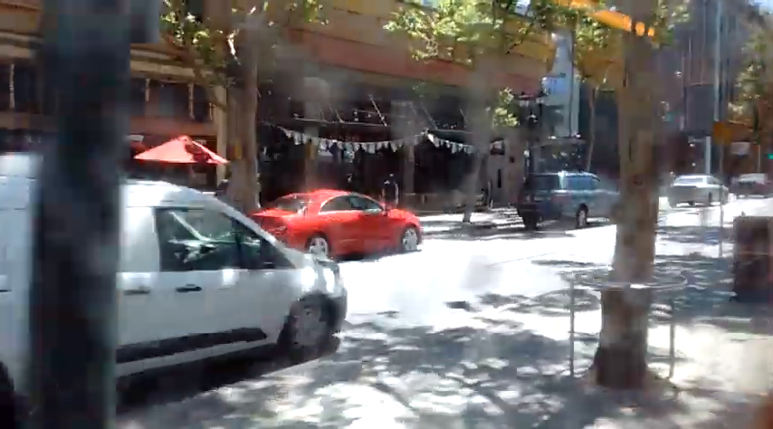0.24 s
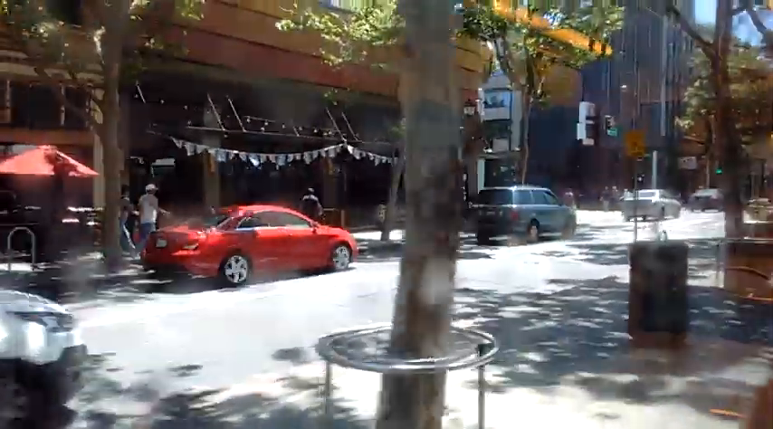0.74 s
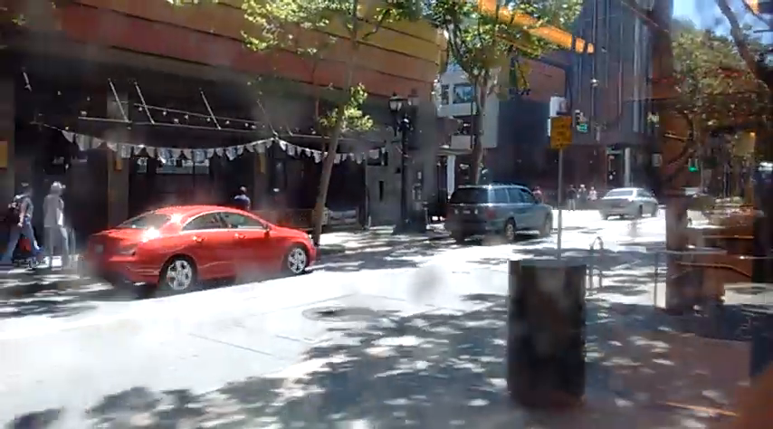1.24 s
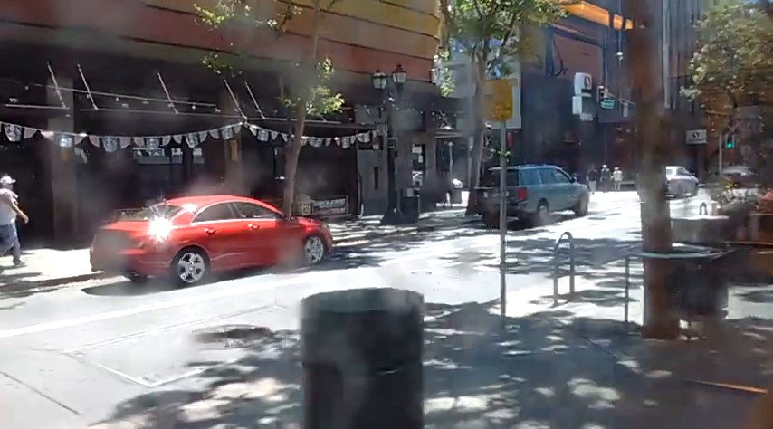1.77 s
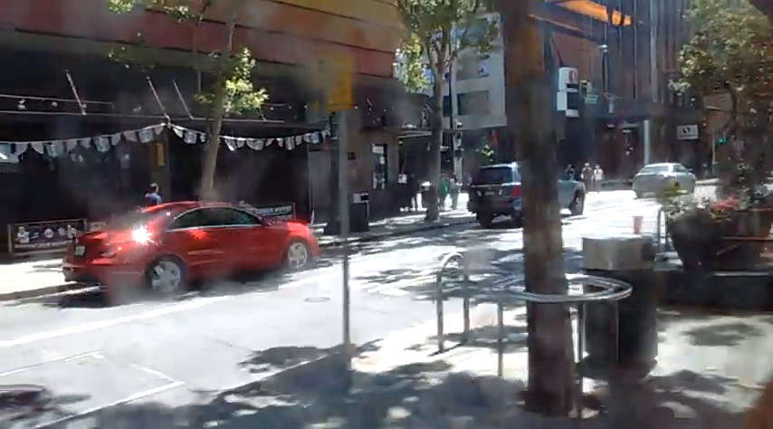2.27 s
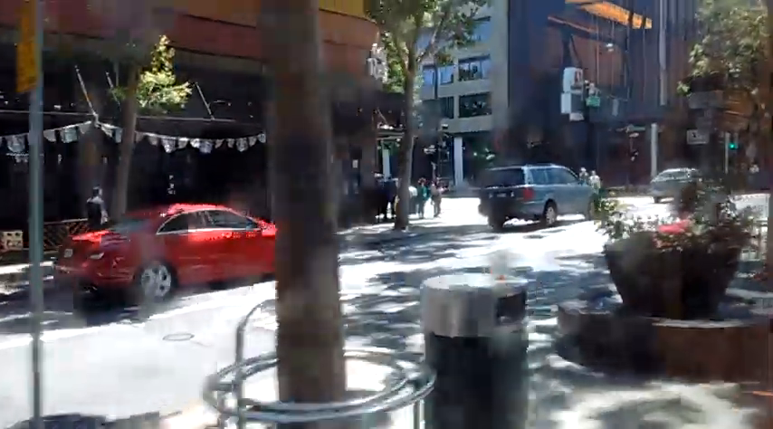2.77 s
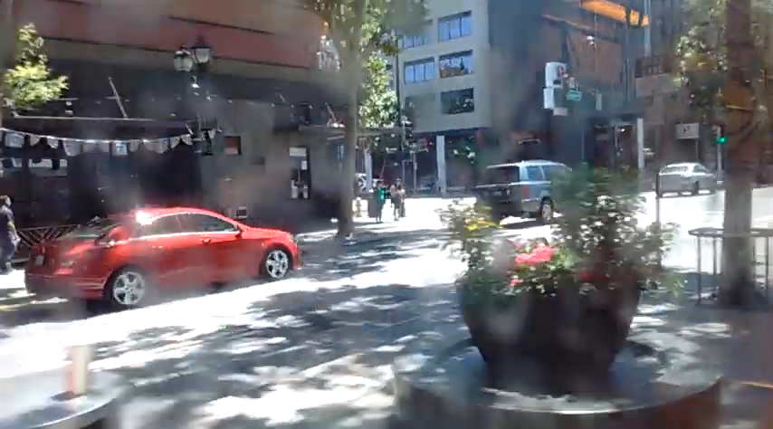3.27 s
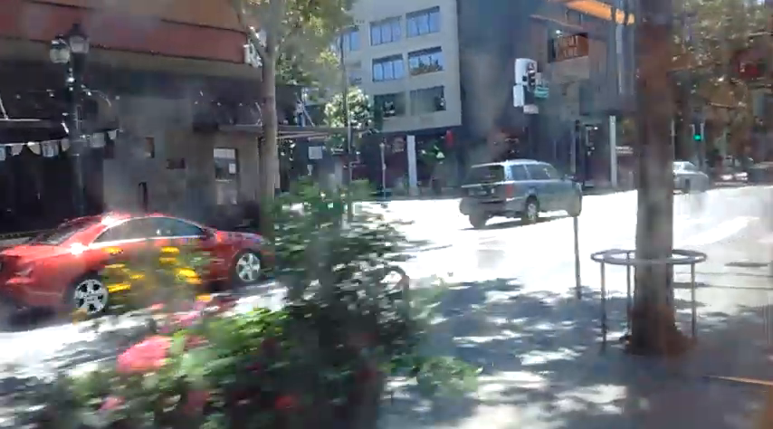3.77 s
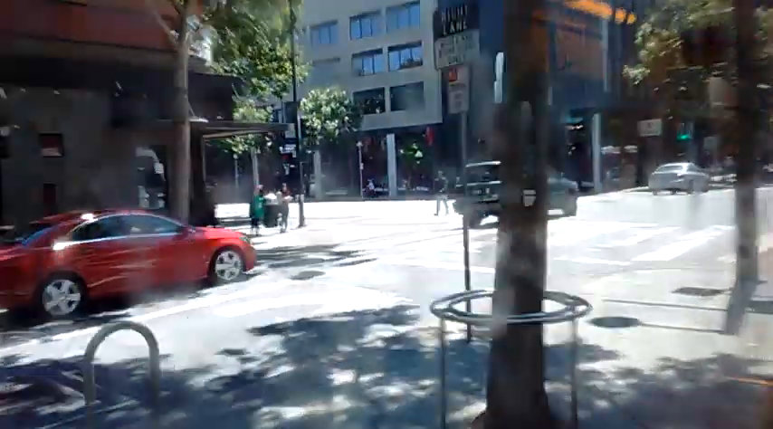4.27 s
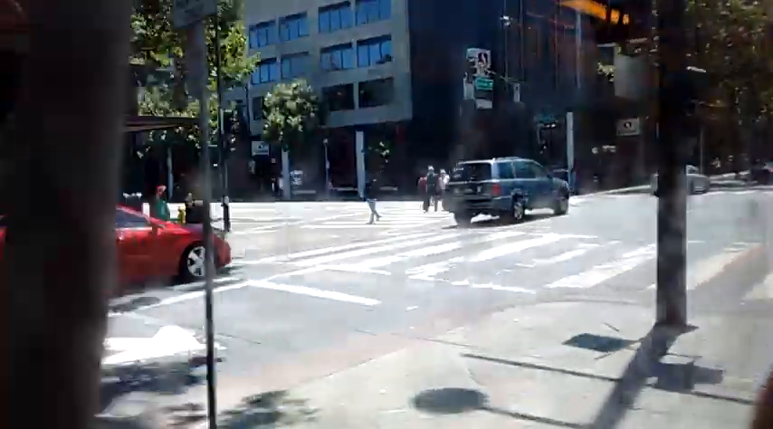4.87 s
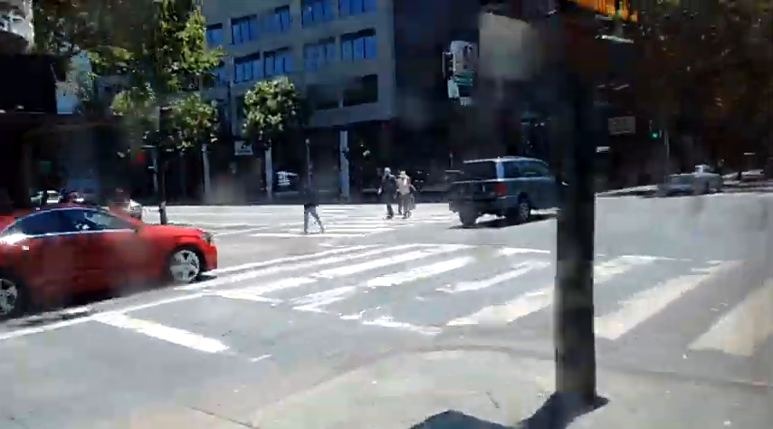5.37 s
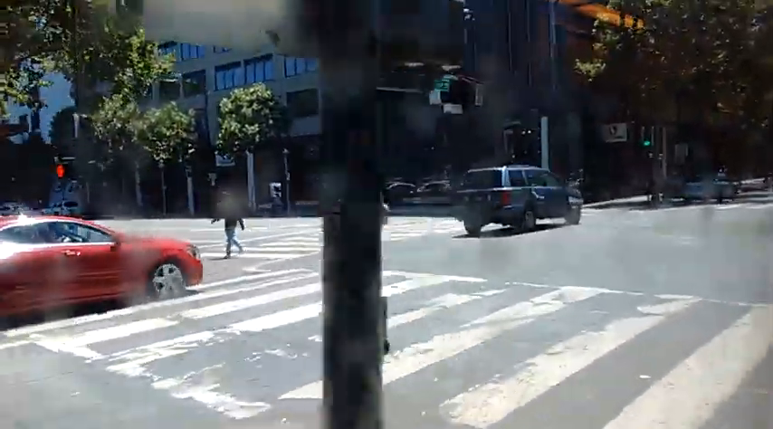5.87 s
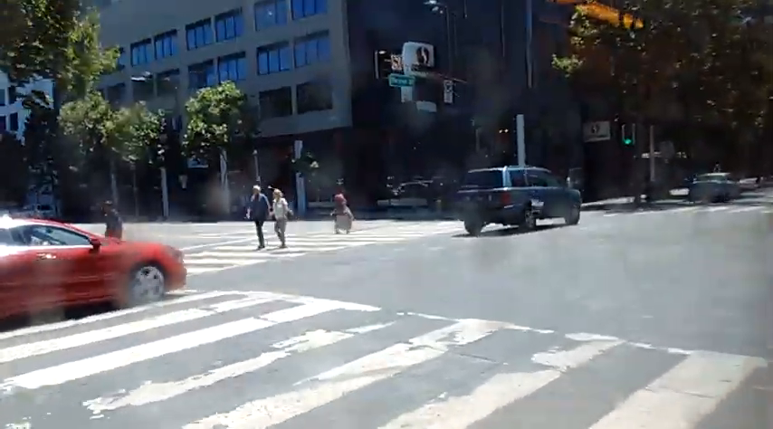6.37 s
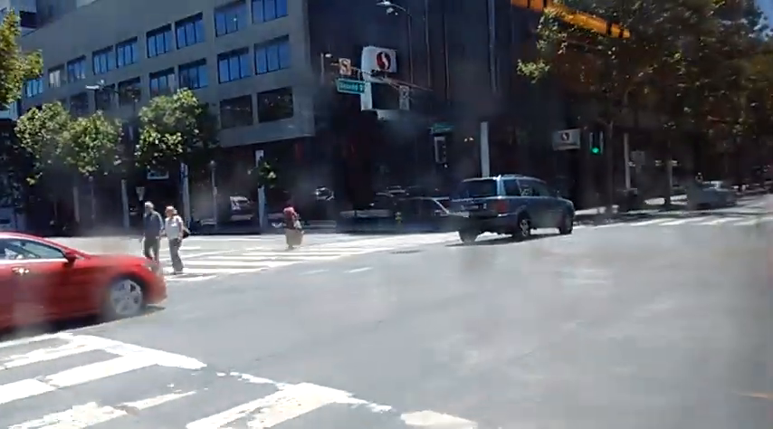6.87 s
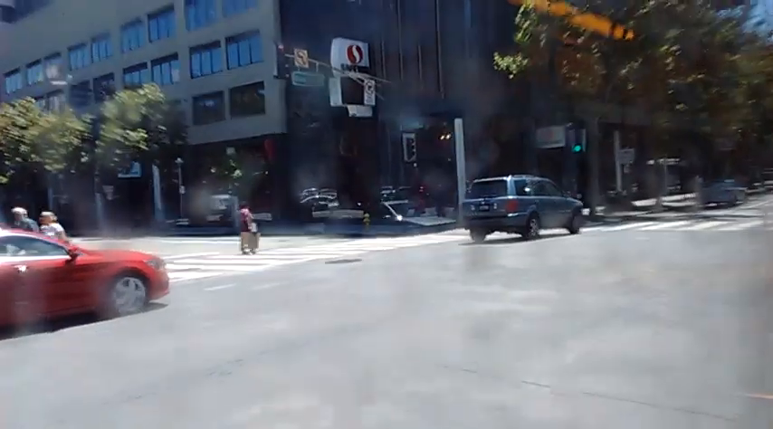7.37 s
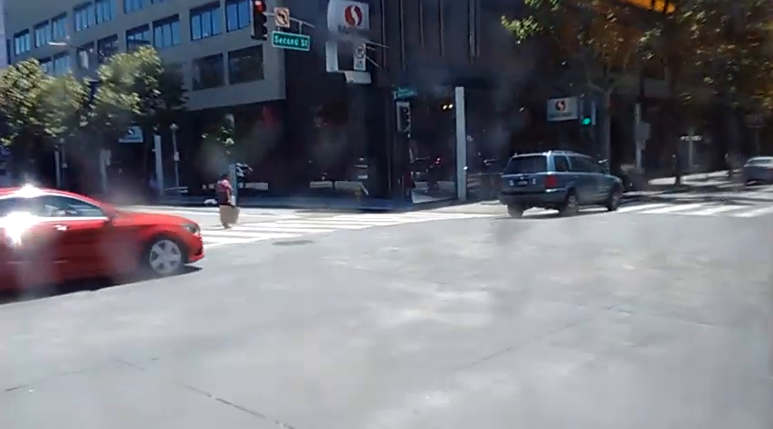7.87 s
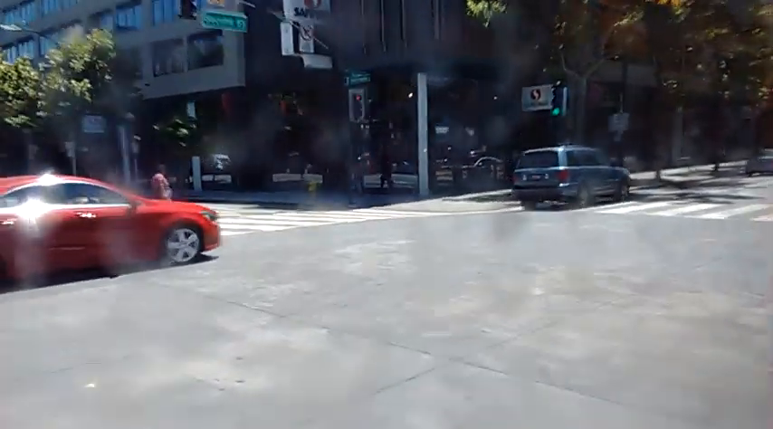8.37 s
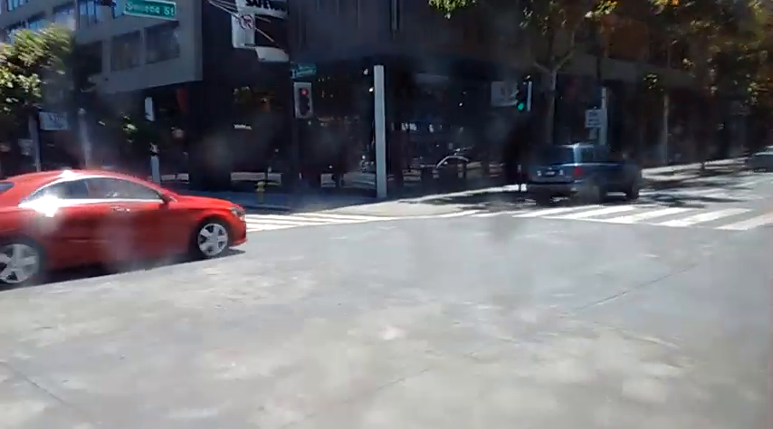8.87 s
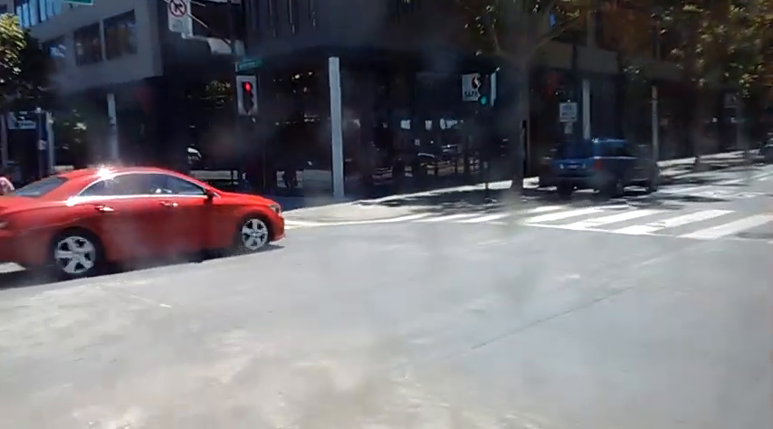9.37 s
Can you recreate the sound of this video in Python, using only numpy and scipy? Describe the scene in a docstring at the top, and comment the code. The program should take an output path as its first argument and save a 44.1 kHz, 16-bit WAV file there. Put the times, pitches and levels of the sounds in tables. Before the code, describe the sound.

Interior of a light rail car running steadily along a city street, heard by a stereo microphone in the cabin for about 9.6 seconds. Throughout, a very low boom dominates, beating and throbbing in irregular soft pulses several times a second, above a broad panel rumble. A low floor drone swells into hums in the first half second. Much quieter are a muffled rail roar, airy hiss, hollow wheel howl and a thin, steady electric whine. Tiny ticks occur near 0.5, 1, 2.7, 3.8 and 4.5 seconds; a low knock with a click and short scuff comes at 3.5. A soft low swell rises around 4.6 to 5. From 5.6 to 6 the wheels pass onto a crossing: rush, hiss and whine soften, the boom grows. Gear tones sing faintly around 6.3 to 7.6. Strong throbs cluster near 8.5, with faint ticks at 8.65, and the ride continues to the end.

```python
"""Cabin air booming and throbbing inside a light rail car, as two resonant modes shaken by the wheels.
Shaped noise makes the panel rumble, growl, howl, rail roar and hiss; bent sines make the hums and singing gear.
On the crossing the rush softens and the boom grows. Steady sines make a thin inverter whine.
Noise bursts make the fittings tick; bands of noise make low swells and thuds, rim ringing and hiss swells."""
import sys
import numpy as np
from scipy import signal
from scipy.fft import rfft, irfft, next_fast_len
from scipy.io import wavfile
from scipy.ndimage import uniform_filter1d, minimum_filter1d

SR = 44100
rng = np.random.default_rng(int(sys.argv[2]) if len(sys.argv) > 2 else 0)


def persist_wave(psi):
    """Save psi, clipped to +-1, as 16-bit WAV."""
    counts = np.round(np.clip(psi, -1, 1) * 32767).astype(np.int16)
    wavfile.write(sys.argv[1], SR, np.atleast_2d(counts).T)


N = 424241
SIZE = next_fast_len(N)
HZ = np.fft.rfftfreq(SIZE, 1 / SR)
TIME = np.arange(N) / SR


def gain_of(db):
    """Amplitude gain from dB."""
    return 10 ** (np.asarray(db) / 20)


def evened(x):
    """Scales to rms 1."""
    return x / np.sqrt(np.mean(x ** 2) + 1e-20)


def over_time(rows):
    """Value at every sample, interpolated from rows of (s, value)."""
    return np.interp(TIME, *np.transpose(rows))


def colour(rows):
    """Gain at every frequency from rows of (Hz, dB), interpolated over log frequency."""
    hz, db = np.transpose(rows)
    return gain_of(np.interp(np.log(HZ + 1), np.log(hz), db))


def resonances(modes):
    """Gain at every frequency of steep-sided resonances whose powers add."""
    power = sum(gain_of(db) ** 2 / (1 + ((HZ - hz) / width) ** 2) ** 3 for hz, width, db in modes)
    return np.sqrt(power)


def filtered(x, shape):
    """Passes both channels through a gain given at every frequency."""
    return irfft(rfft(x, SIZE) * shape, SIZE)[:, :N]


def white():
    """Spectrum of fresh white noise."""
    return rng.standard_normal(len(HZ)) + 1j * rng.standard_normal(len(HZ))


def wobble(rate_hz):
    """Random drift of rms 1, up to about the given rate."""
    return evened(irfft(white() / (1 + (HZ / rate_hz) ** 2), SIZE)[:N])


# The two microphone ports, opposed in the bass. Each row: frequency in Hz, likeness 0-1,
# lead of the left in radians, left minus right in dB.
PORT_RESPONSE = [(30, 0.97, 3.13, 1.8), (70, 0.9995, 3.13, 1.7), (200, 0.998, 3.14, 1.9),
                 (400, 0.9939, 3.2, 2.5), (600, 0.8789, 3.45, 4.3), (800, 0.8091, 3.91, 4.8),
                 (1000, 0.5469, 4.38, 6.5), (1200, 0.8081, 5.82, 4.8), (1550, 0.9314, 6.42, 4.3),
                 (2000, 0.8199, 6.99, 5.1), (2450, 0.5463, 8.46, 5.4), (2800, 0.8125, 9.32, 4.0),
                 (3250, 0.8503, 9.52, 2.9), (3950, 0.0518, 11.21, 3.3), (4650, 0.8019, 12.55, 3.1),
                 (5500, 0.1905, 11.11, 1.3), (6350, 0.9159, 9.42, -0.5), (7200, 0.5858, 7.84, -4.0),
                 (8000, 0.626, 6.5, -5.3), (9500, 0.3923, 3.95, -3.7), (12000, 0.752, 6.34, -0.2)]


def port_pair():
    """Spectral gains to the right port: of the left port's sound, and of sound of its own."""
    hz, *columns = np.transpose(PORT_RESPONSE)
    same, lead_rad, balance_db = (np.interp(HZ, hz, c) for c in columns)
    same = np.clip(same, 0, 1)
    shared = same * np.exp(-1j * lead_rad) / gain_of(balance_db)
    own = np.sqrt(1 - same ** 2) / gain_of(balance_db)
    return shared, own


def heard(x, ports):
    """One clear sound as it arrives at the left and right ports."""
    return irfft(rfft(x, SIZE) * np.array([np.ones(len(HZ)), ports[0]]), SIZE)[:, :N]


def noise(shape, ports):
    """Diffuse noise of the given spectrum at both ports; rms 1 on the left."""
    shared, own = ports
    left = white()
    right = shared * left + own * white()
    x = irfft(np.array([left, right]) * shape, SIZE)[:, :N]
    return x / np.sqrt(np.mean(x[0] ** 2))


def steadied(x, span_s):
    """Evens out swells slower than span_s and keeps the faster beating."""
    size = max(int(span_s * SR), 1)
    power = uniform_filter1d(uniform_filter1d(x[0] ** 2, size), size)
    return x / np.sqrt(abs(power) + 1e-6)


def strands(modes, ports, span_s):
    """Each mode rings as its own steadied noise band, scaled by the modes' total power."""
    power = sum(gain_of(db) ** 2 for hz, width, db in modes)
    total = sum(gain_of(db) * steadied(noise(resonances([(hz, width, 0)]), ports), span_s)
                for hz, width, db in modes)
    return total / np.sqrt(power)


def arch(s, length_s):
    """A smooth rise from 0 to 1 and back, centred on s."""
    out, near = np.zeros(N), abs(TIME - s) < length_s / 2
    out[near] = np.cos(np.pi * (TIME[near] - s) / length_s) ** 2
    return out


def swell(ports, s, length_s, hz, width_hz, db):
    """A band of noise that rises and falls once."""
    return gain_of(db) * arch(s, length_s) * noise(resonances([(hz, width_hz, 0)]), ports)


def tones(rows, bend, peaked):
    """Each row of (centre s, length s, Hz, dB) rises and falls once, its pitch bending up or down."""
    out = np.zeros(N)
    draws = rng.uniform(-1.17, 1, (len(rows), 2))
    for (s, length_s, hz, db), (phase, way) in zip(rows, draws):
        near = abs(TIME - s) < length_s / 2
        t = TIME[near] - s
        turns = hz * (t + way * bend * t ** 2 / length_s) + phase
        envelope = abs(np.cos(np.pi * t / length_s)) ** peaked
        out[near] += gain_of(db) * envelope * np.sin(2 * np.pi * turns)
    return out


# Passage from paving onto the street crossing. Each row: time in seconds, share of crossing 0-1.
CROSSING = [(5.6, 0), (5.95, 0.99)]


def crossing_share():
    """How far the wheels are on the crossing, 0-1, at every sample."""
    return over_time(CROSSING)


# Roughness of the track under the wheels. Each row: time in seconds, roughness in dB about its mean.
TRACK_ROUGHNESS = [(0.0, -0.8), (.15, -0.8), (.33, 1.1), (.46, 2), (.53, -1.5), (.7, -1.5), (.86, -1.2),
                   (.95, 0.5), (1.13, 1.3), (1.27, -2), (1.42, -0.1), (1.51, -3), (1.75, 0.2), (1.85, 1.5),
                   (1.98, 1.5), (2.13, 1.2), (2.35, 2), (2.47, -0.5), (2.63, 0.5), (2.72, 1.3),
                   (2.78, -1.9), (3.0, .4), (3.13, 1.5), (3.33, -0.5), (3.51, 2.2), (3.74, 0), (3.87, 0),
                   (4.02, 0), (4.35, 0), (4.58, 1), (4.7, 0.4), (4.9, -0.5), (5.15, 0.5), (5.28, -1.6),
                   (5.38, 0.8), (5.5, -2.6), (5.58, -0.8), (5.78, 1), (5.9, -1), (6.12, -1.5), (6.27, 1.7),
                   (6.43, 0), (6.5, 1.4), (6.72, 0.3), (7.0, 0.5), (7.06, -.4), (7.22, -1), (7.33, 2),
                   (7.47, 2.5), (7.62, -1.7), (7.68, -0.3), (8.1, 0), (8.15, -1.2), (8.29, -3.5),
                   (8.38, -1.5), (8.65, 1), (8.82, -2.5), (8.93, -1.5), (9.06, .5), (9.22, 0), (9.35, -3),
                   (9.5, 0), (9.61, 3)]


def ride(follow, db=0, crossing_db=0):
    """Gain of a layer: its own level, a share of the track's roughness, and a step onto the crossing."""
    return gain_of(db + follow * over_time(TRACK_ROUGHNESS) + crossing_db * crossing_share())


# Lowest and next air mode of the cabin. Each row: frequency in Hz, width in Hz, relative level in dB.
LOW_BOOM_MODES = [(84.15, 11.6, 0)]
HIGH_BOOM_MODES = [(101.7, 13, 0)]
# Throbs as the wheels bump along. Each row: centre in seconds, length in seconds before ringing,
# guide pitch in Hz that weights the two modes, peak in dB.
THROBS = [(0.308, .05, 94, -9), (0.573, 0.061, 92, -6.5), (0.622, 0.037, 94, -3), (0.652, .03, 97, -4.5),
          (1.06, 0.049, 99, -2.5), (1.113, 0.046, 98, -5.5), (1.183, 0.062, 92, -6.5),
          (1.491, 0.048, 93.4, -4.5), (1.846, .05, 90, -6.5), (2.045, .1, 89, -6), (2.122, .06, 90, -2.5),
          (2.187, 0.05, 88, -3.5), (2.403, 0.073, 86, -4.5), (2.49, 0.11, 94.5, -4), (2.6, .05, 94, -7.5),
          (2.728, .07, 100, -6.5), (2.784, 0.055, 96, -8), (3.032, 0.041, 94, -7), (3.183, 0.095, 96, -0.5),
          (3.376, 0.038, 98, -3.5), (3.42, .04, 92, -5.5), (3.505, .05, 91, -4.5), (3.555, 0.055, 100, -7),
          (4.025, 0.044, 95, -4.5), (4.090, .04, 94, -6.5), (4.206, .12, 95.7, -4), (4.465, .05, 96, -5),
          (4.627, 0.095, 94, -4), (4.775, .03, 100, -4.5), (4.862, 0.063, 97, -4), (4.949, 0.046, 98, -6),
          (5.14, 0.057, 85, -9), (5.444, 0.045, 97.2, -4), (5.482, 0.045, 89, -3), (5.582, .06, 91, -4),
          (5.697, 0.094, 87, -5), (5.875, 0.092, 89.8, -1.5), (6.009, 0.082, 97, -1.5),
          (6.095, 0.043, 94, -6.5), (6.18, 0.057, 94, -2.5), (6.311, .07, 94.6, -2.5),
          (6.396, 0.069, 98.9, -7), (6.469, .04, 94.5, -5.5), (6.506, 0.077, 88.4, 0),
          (6.648, 0.083, 91.8, -2.5), (6.816, 0.15, 97.6, -4.5), (6.95, 0.061, 89.4, -4),
          (7.285, .07, 88, -4), (7.37, .12, 86.5, -2), (7.432, .05, 89, -5), (7.488, .07, 86, -3.5),
          (7.59, 0.074, 82, -1.5), (7.746, 0.058, 89, -7), (7.796, 0.068, 90, -1.5), (7.942, .08, 89, -2),
          (8.135, 0.13, 85, -2.5), (8.180, .04, 85.9, -4.5), (8.303, 0.04, 91, -5), (8.442, .07, 98, -5),
          (8.525, .06, 97, 1.5), (8.587, 0.061, 98, -2), (8.637, .06, 97, 0), (8.711, .07, 88.9, -0.5),
          (8.776, .06, 88, -6), (8.871, .06, 99, -7), (9.018, .09, 88, -2), (9.102, .05, 88.6, -4),
          (9.171, 0.047, 88.8, -3.5), (9.266, .16, 81, -2.5), (9.375, 0.04, 90.8, -4), (9.526, .04, 95, -4),
          (9.571, 0.063, 84.7, -3.5)]


def throbs(wander_hz=2.0, peaked=1.33, ring_s=0.064):
    """The two air modes swing as clean tones and fall into step at each throb; its pitch says which leads."""
    s, length_s, hz, db = np.transpose(THROBS)
    low_hz, high_hz = LOW_BOOM_MODES[0][0], HIGH_BOOM_MODES[0][0]
    # whole beats between neighbouring throbs
    beats = np.maximum(np.round(np.diff(s) * (high_hz - low_hz)), 1)
    apart = np.interp(TIME, s, np.append(0, np.cumsum(beats)))
    turns = np.cumsum((low_hz + high_hz) / 2 + wander_hz * wobble(rate_hz=2.78)) / SR
    upper = np.interp(np.interp(TIME, s, hz), [low_hz, high_hz], [0, 1])
    low = (1 - upper) * np.sin(2 * np.pi * (turns - apart / 2))
    high = upper * np.sin(2 * np.pi * (turns + apart / 2))
    throbbing = np.zeros(N)
    for centre, span in zip(s, length_s):
        throbbing = np.maximum(throbbing, arch(centre, span + ring_s))
    return gain_of(np.interp(TIME, s, db)) * throbbing ** (peaked / 2) * (low + high), throbbing


# Levels of the two air modes. Each row: time in seconds, relative level in dB.
LOW_BOOM_LEVEL = [(0.01, -10.5), (0.69, -19), (0.87, -27), (1.71, -19), (2.03, -17), (3.73, -15),
                  (5.79, -11), (7.11, -16), (7.37, -12), (8.17, -14), (8.43, -12), (9.59, -12)]
HIGH_BOOM_LEVEL = [(0.01, -14), (1.21, -14), (1.57, -14.5), (3.49, -13), (3.83, -20.5), (4.07, -17),
                   (5.31, -17), (6.09, -9), (6.79, -12.5), (7.15, -15.5), (8.29, -13), (8.53, -9),
                   (9.15, -18), (9.59, -9)]


def cabin_boom(ports, centre_hz=94, half_width_hz=21, boom_db=-3.5, throb_share=0.73):
    """Two beating air modes boom within a narrow range and partly give way to each throb."""
    low_air = steadied(noise(resonances(LOW_BOOM_MODES), ports), span_s=0.21)
    high_air = steadied(noise(resonances(HIGH_BOOM_MODES), ports), span_s=0.29)
    air = gain_of(over_time(LOW_BOOM_LEVEL)) * low_air + gain_of(over_time(HIGH_BOOM_LEVEL)) * high_air
    boom = filtered(air, 1 / np.sqrt(1 + ((HZ - centre_hz) / half_width_hz) ** 12))
    throb, throbbing = throbs()
    return gain_of(boom_db) * boom * (1 - throb_share * throbbing) + heard(throb, ports)


# Drone about an octave above the boom. Each row: time in seconds, level in dB on track of mean roughness.
DRONE_LEVEL = [(0.0, -18.5), (0.45, -17.5), (0.7, -22.5), (1.5, -25), (3.8, -26), (4.6, -20), (5.1, -24),
               (5.5, -24), (5.85, -22.5), (6.35, -29), (6.65, -19.5), (7.0, -26), (7.8, -20.5), (8.3, -23),
               (8.85, -19), (9.6, -23.5)]
# Floor resonances. Each row: frequency in Hz, width in Hz, relative level in dB.
DRONE_MODES = [(162.6, 15, -3), (184.9, 16, -0.5)]
# Drone swelling into a clear hum. Each row: centre in seconds, length in seconds, pitch in Hz, peak in dB.
HUMS = [(0.126, 0.31, 170, -12), (0.44, 0.35, 172.8, -14), (1.401, 0.067, 154, -13),
        (6.832, 0.24, 176.4, -15), (8.795, 0.135, 179.4, -15), (9.06, 0.23, 183.5, -17.5),
        (9.55, 0.25, 174, -14)]


def floor_drone(ports):
    """Track roughness shakes the floor's resonances, which at times swell into a clear hum."""
    drone = steadied(noise(resonances(DRONE_MODES), ports), span_s=0.27)
    hums = tones(HUMS, bend=0.026, peaked=2.1)
    return gain_of(over_time(DRONE_LEVEL)) * ride(follow=1.0) * drone + heard(hums, ports)


# Broad body rumble. Each row: frequency in Hz, relative density in dB per Hz.
BODY_COLOUR = [(8, -28), (25, -16), (42, -9), (52, -9), (68, 4), (80, -1.5), (115, -8.5), (160, -2),
               (205, -9), (320, -9.5), (440, -12.5), (510, -18.5), (700, -18.5), (950, -31), (3000, -74)]
# Panel peaks on top of the rumble. Each row: frequency in Hz, width in Hz, relative level in dB.
PANEL_MODES = [(58.3, 7.8, 0.5), (134, 23, 6.5), (223.4, 13.5, -7), (259.2, 11, -7.5), (313, 48, -13.5)]


def panel_rumble(ports):
    """Track roughness shakes body and panels, which calm down on the crossing."""
    body = steadied(noise(colour(BODY_COLOUR), ports), span_s=0.083)
    panels = steadied(noise(resonances(PANEL_MODES), ports), span_s=0.22)
    return (ride(follow=0.86, db=-23.0, crossing_db=-3.0) * body
            + ride(follow=0.31, db=-21.0, crossing_db=-5.0) * panels)


# Gear resonances. Each row: frequency in Hz, width in Hz, relative level in dB.
GROWL_MODES = [(381, 15, 0.32), (402, 7.6, 0.5)]


def gear_growl(ports):
    """Track roughness drives narrow resonances of the running gear."""
    return ride(follow=1.5, db=-37.0, crossing_db=1.5) * strands(GROWL_MODES, ports, span_s=0.13)


# Hollow howl in swells. Each row: time in seconds, level in dB before roughening.
HOWL_LEVEL = [(0.0, -42.5), (.4, -34), (.7, -39.5), (1.0, -35), (1.25, -36.5), (1.5, -39), (1.9, -39.5),
              (2.28, -35), (2.45, -37), (2.75, -44), (3.05, -35), (3.55, -35), (4.0, -40), (4.3, -34.5),
              (4.55, -33.5), (5.05, -41), (5.25, -36), (5.5, -41), (5.7, -35), (6.0, -45), (6.18, -38),
              (6.3, -38), (6.6, -36), (6.8, -33), (6.95, -32.5), (7.1, -44), (7.47, -33), (7.65, -39),
              (7.87, -35), (8.1, -36.5), (8.28, -40), (8.45, -38.5), (8.68, -39.5), (8.82, -48), (9.1, -36),
              (9.3, -45), (9.58, -36)]
# Wheel resonances. Each row: frequency in Hz, width in Hz, relative level in dB.
HOWL_MODES = [(665, 46, -2), (749, 36, 3), (788.5, 27, 3.5), (838, 56, 0.8), (1665, 140, -6.5)]


def wheel_howl(ports, rough_db=1.0):
    """Wheel resonances ring in fuzzy bands, mostly about an octave above the growl."""
    howl = gain_of(over_time(HOWL_LEVEL)) * strands(HOWL_MODES, ports, span_s=0.12)
    return howl * gain_of(rough_db * wobble(rate_hz=21))


def reflections(delay_s=.012, strength=0.14, count=14):
    """Gain at every frequency of direct sound plus echoes off windows and seats."""
    lags_s = delay_s * rng.uniform(0.203, 2, count)
    signs = rng.choice([-1, 1], count)
    echoes = sum(sign * np.exp(-2j * np.pi * HZ * lag) for lag, sign in zip(lags_s, signs))
    return abs(1 + strength * echoes / np.sqrt(count))


# Rail roar and hiss. Each row: frequency in Hz, relative density in dB per Hz.
ROAR_COLOUR = [(200, -38), (650, -10), (1000, 0), (1600, 0.5), (2100, -1.5), (2550, -2.5), (2780, -8),
               (3500, -16), (4550, -14), (4950, -25), (7000, -54), (12000, -63)]
HISS_COLOUR = [(800, -31), (2800, 8), (4500, 5.5), (5100, 3), (6500, -3.5), (8000, -5), (10000, -12),
               (12000, -20.5), (14000, -28), (15300, -31)]
# Crossing's recolouring of the roar. Each entry: change in dB, by octave from 1 kHz up.
CROSSING_ROAR_DB = [-0.5, 0.4, -0.5]
# Rims that ring only on the crossing. Each row: frequency in Hz, width in Hz, relative level in dB.
RIM_MODES = [(1590, 97, -0.5), (2130, 230, -5.5), (2492, 140, -0.5)]


def rail_rush(ports, flutter_db=0.72, patchy_db=0.54, rim_db=-9):
    """Roar and hiss follow the track's roughness and flutter at random, each octave of the roar also alone."""
    rails = noise(colour(ROAR_COLOUR) * reflections(), ports)
    octave = np.clip(np.log2((HZ + 1) / 1000), 0, 2)
    crossing = crossing_share()
    roar = np.zeros((2, N))
    for k, change_db in enumerate(CROSSING_ROAR_DB):
        band = filtered(rails, np.maximum(1 - abs(octave - k), 0))
        roar += band * gain_of(change_db * crossing + patchy_db * wobble(rate_hz=16.0))
    rims = gain_of(rim_db) * crossing * noise(resonances(RIM_MODES), ports)
    hiss = noise(colour(HISS_COLOUR), ports)
    rush = ride(follow=1.0, db=-33.5, crossing_db=-4.0) * (roar + rims)
    rush += ride(follow=0.72, db=-46.0, crossing_db=-5.0) * hiss
    return rush * gain_of(flutter_db * wobble(rate_hz=18))


# Traction inverter tones. Each row: frequency in Hz, mean left level in dB before the crossing,
# right minus left in dB, change on the crossing in dB.
INVERTER_TONES = [(2029, -55, -6.5, -5.5), (3996, -68.5, -1, -9)]


def inverter_whine(fade_db=4.5):
    """Thin tones of steady pitch whose levels waver and sink on the crossing."""
    out = np.zeros((2, N))
    for hz, db, balance_db, crossing_db in INVERTER_TONES:
        gain = gain_of(db + crossing_db * crossing_share() + fade_db * wobble(rate_hz=4))
        out += gain_of([[0], [balance_db]]) * gain * np.sqrt(2) * np.sin(2 * np.pi * hz * TIME)
    return out


# Running gear tones. Each row: centre in seconds, length in seconds, mean pitch in Hz, relative peak in dB.
GEAR_TONES = [(0.121, .12, 408, -27), (0.333, 0.52, 396, -27), (1.141, 0.19, 397, -27),
              (1.39, 0.3, 397, -31), (1.869, 0.2, 408, -30), (2.714, .14, 402, -27),
              (3.109, 0.27, 389, -32), (3.378, 0.22, 401, -25.5), (4.237, 0.35, 380.6, -25),
              (4.613, 0.27, 388, -28), (5.8, 0.32, 383.4, -26), (6.06, .4, 386, -31),
              (6.288, 0.2, 384, -20.5), (6.458, 0.53, 385.6, -22), (7.223, .13, 392, -28),
              (7.33, 0.16, 381, -22), (7.469, 0.11, 388, -34), (7.568, .25, 394, -27),
              (7.889, 0.12, 391.4, -26.5), (8.551, 0.31, 684, -44), (6.77, .3, 748, -33),
              (6.88, 0.39, 801, -35), (7.87, .28, 794, -32), (8.06, 0.33, 767, -38.5),
              (8.05, .4, 1610, -47), (1.1, 0.44, 1620, -39), (8.55, 0.34, 1600, -44)]


def gear_song(ports, rough_db=2.0, octave_db=-14, song_db=0.9, waver=0.019):
    """The running gear sings in clear tones with a faint octave; the pitch wavers slightly at random."""
    octaves = [(s, length_s, 2 * hz, db + octave_db) for s, length_s, hz, db in GEAR_TONES]
    song = tones(GEAR_TONES + octaves, bend=0.012, peaked=3.5)
    song = song * gain_of(song_db + rough_db * wobble(rate_hz=25))
    lag_s = np.cumsum(waver * wobble(rate_hz=21.0)) / SR
    lag_s = lag_s - uniform_filter1d(lag_s, size=16384)
    return heard(np.interp(TIME + lag_s, TIME, song), ports)


# Ticks of loose fittings. Each row: start in seconds, relative level in dB, centre in Hz,
# decay constant in seconds.
TICKS = [(.467, -50, 7000, .002), (.995, -47, 7000, .002), (2.674, -50, 7500, .002),
         (3.029, -57, 13500, .002), (3.506, -32, 2200, 0.0011), (3.848, -39, 8300, 0.0014),
         (4.469, -41, 6500, .002), (8.640, -52, 10500, .002), (8.652, -53, 11500, .002),
         (8.662, -51, 11000, .0018)]


def fittings(size=2048):
    """Each tick is a burst that dies within milliseconds, coloured by the fitting."""
    out, t, f = np.zeros((2, N)), np.arange(size) / SR, np.fft.rfftfreq(size, 1 / SR)
    for s, db, hz, decay_s in TICKS:
        burst = rng.standard_normal((2, size)) * np.exp(-t / decay_s)
        shape = evened(1 / (1 + (2 * (f - hz) / hz) ** 2) ** 1.5)
        # onset in mid-block, so the filter can spread both ways
        tick = irfft(rfft(np.roll(burst, size // 2, axis=1)) * shape)
        part = out[:, round(s * SR) - size // 2:][:, :size]
        part += gain_of(db) * tick[:, :part.shape[1]]
    return out


# Low swells. Each row: centre in seconds, length in seconds, frequency in Hz, width in Hz, level in dB.
LOW_SWELLS = [(3.512, 0.12, 290, 47, -21), (3.63, .3, 29, 12, -35), (4.568, 0.36, 305, 49, -23.5),
              (2.6, 1.7, 150, 24, -22.5), (5.046, 1.06, 138.5, 9.7, -18), (5.3, .4, 32, 14, -37),
              (6.255, 0.25, 312, 40, -28), (7.477, 0.17, 330, 90, -28)]


def low_swells(ports):
    """Bands of low noise rise and fall, some as short thuds and knocks, some lasting over a second."""
    return sum(swell(ports, *row) for row in LOW_SWELLS)


# Rim swells. Each row: centre in seconds, length in seconds, frequency in Hz, width in Hz, level in dB.
RIM_SWELLS = [(2.4, 1.0, 2560, 260, -44), (7.0, 0.61, 2190, 330, -40.5)]


def rim_swells(ports):
    """The ringing of the wheel rims swells in narrow bands of noise."""
    return sum(swell(ports, *row) for row in RIM_SWELLS)


# Hiss swells. Each row: centre in seconds, length in seconds, frequency in Hz, width in Hz,
# level in dB before fluttering.
HISS_SWELLS = [(3.28, 0.5, 8400, 5000, -55), (3.59, 0.22, 4400, 3000, -42), (4.6, 0.21, 7200, 2900, -56.5),
               (4.43, 3.2, 7700, 5800, -69), (8.385, .09, 9200, 3500, -63)]


def hiss_swells(ports, flutter_db=1.0):
    """Wide bands of high noise, some brief scuffs, one long and faint, with a fast flutter."""
    return sum(swell(ports, *row) for row in HISS_SWELLS) * gain_of(flutter_db * wobble(rate_hz=300))


def scene():
    """Sums all sources at the two ports."""
    ports = port_pair()
    cabin = cabin_boom(ports) + floor_drone(ports) + panel_rumble(ports) + low_swells(ports)
    running_gear = gear_growl(ports) + wheel_howl(ports) + gear_song(ports)
    rolling = rail_rush(ports) + rim_swells(ports) + hiss_swells(ports)
    return cabin + running_gear + rolling + inverter_whine() + fittings()


def record(dry, limit=.99, edge_hz=15300):
    """A smooth limiter holds down the tallest peaks; then a low-pass sets the band limit."""
    room = np.minimum(1, limit / (abs(dry).max(axis=0) + 1e-9))
    gain = uniform_filter1d(minimum_filter1d(room, size=901), size=901)
    low_pass = signal.firwin(511, edge_hz, window=("kaiser", 9), fs=SR)
    return signal.oaconvolve(dry * gain, low_pass[None], "same")


dry = scene()
out = record(dry)
persist_wave(out)
```